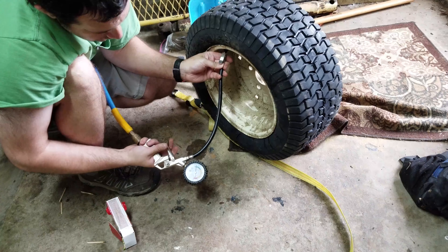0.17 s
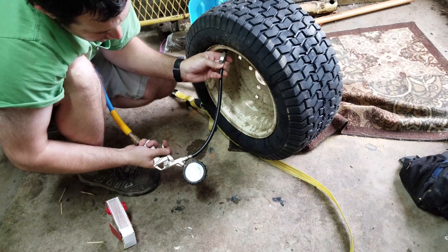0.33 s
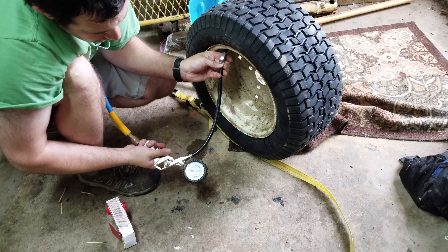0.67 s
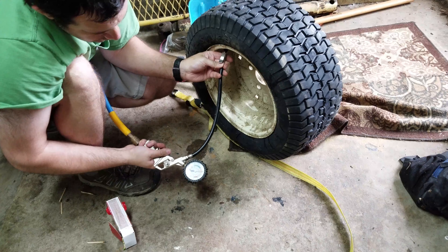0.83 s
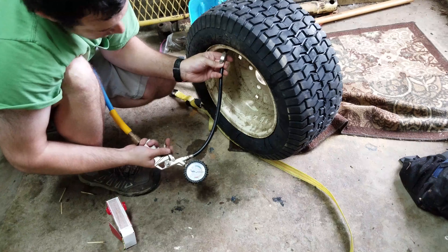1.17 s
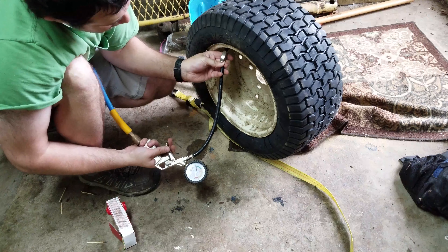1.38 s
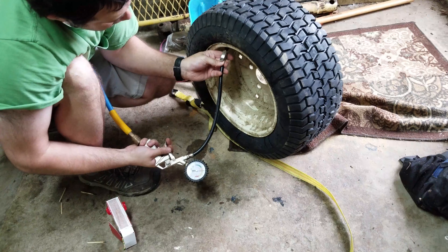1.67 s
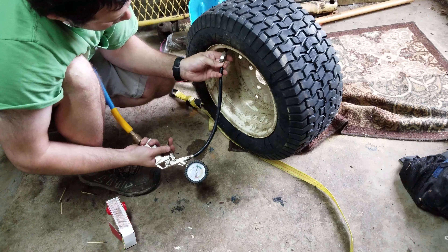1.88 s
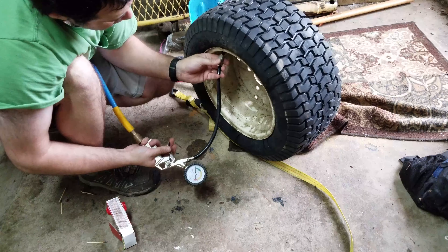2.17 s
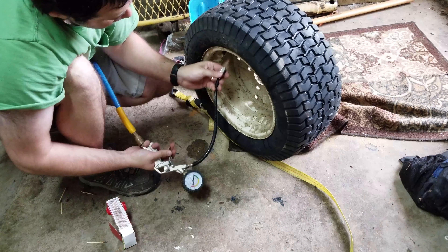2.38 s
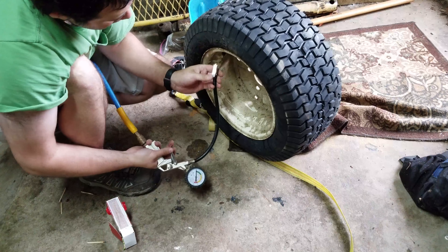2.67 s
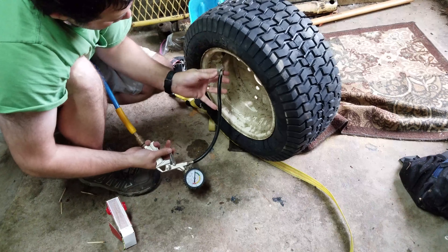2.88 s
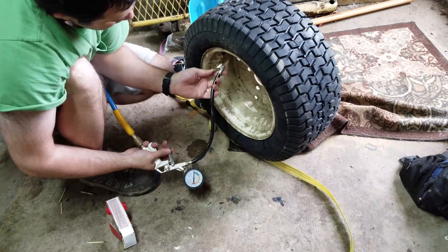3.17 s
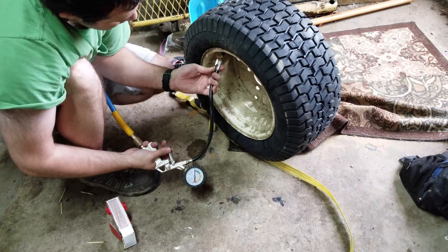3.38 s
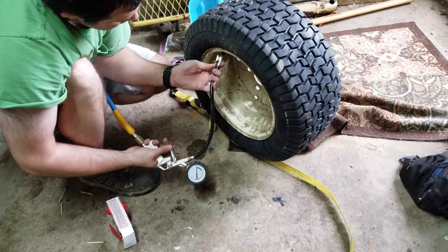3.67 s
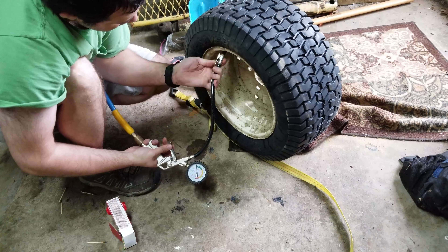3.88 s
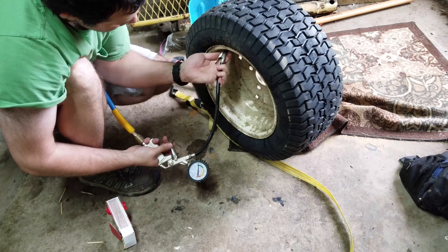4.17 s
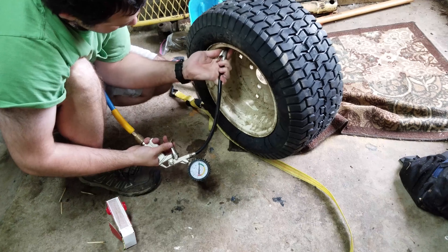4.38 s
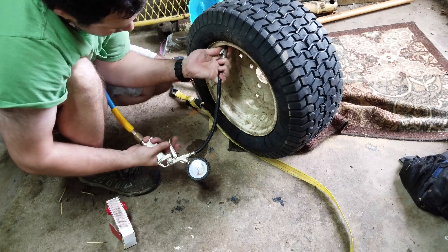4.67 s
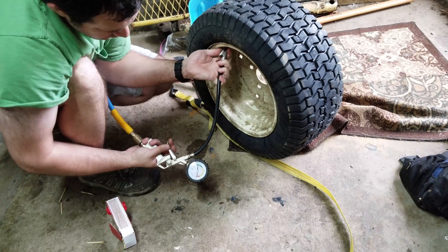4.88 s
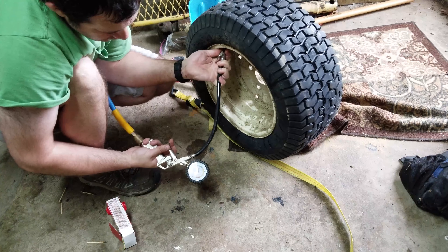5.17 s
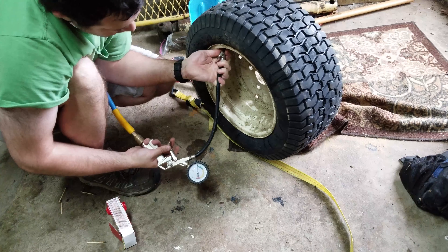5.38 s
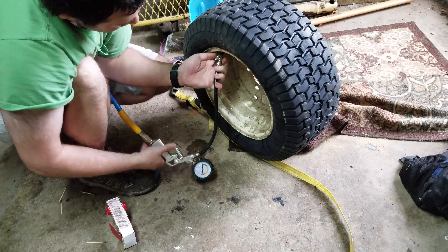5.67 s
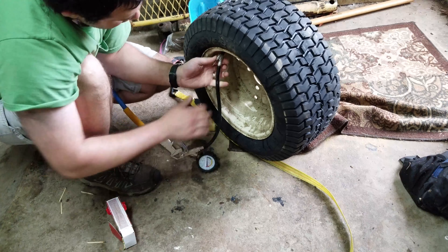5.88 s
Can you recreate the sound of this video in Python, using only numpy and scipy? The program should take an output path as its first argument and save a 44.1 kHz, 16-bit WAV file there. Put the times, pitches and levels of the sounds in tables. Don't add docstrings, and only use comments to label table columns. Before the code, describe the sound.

Harsh fizzing air spurts from a chuck on a tire, with faint whistling, small metal clicks and one sudden loud blast over low hum.

```python
import sys
import numpy as np
from scipy import signal
from scipy.fft import rfft, irfft, next_fast_len
from scipy.io import wavfile
from scipy.ndimage import uniform_filter1d

SR = 44100
rng = np.random.default_rng(int(sys.argv[2]) if len(sys.argv) > 2 else 0)


def convert_level_to_amplitude(level_db):
    exponent = np.asarray(level_db, float) / 20
    return 10 ** exponent


def log_audio(samples):
    frames = np.atleast_2d(samples).T
    limited = np.clip(frames, -1, 1)
    pcm = np.round(limited * 32767).astype(np.int16)
    wavfile.write(sys.argv[1], SR, pcm)


N = 265658

# f/Hz, level/dB per Hz
RUMBLE_COLOUR = [(15, -27), (30, -7), (43, -18), (58, 5), (72, -5), (89, -3.5), (121, -4.5), (190, -17),
                 (390, -24), (920, -23.5), (1400, -21), (1750, -26.5), (2000, -18.5), (5000, -44)]
RUMBLE_DB, RUMBLE_SWELL_DB = -78, 1.4
# multiple of its turning speed, level/dB rms
MOTOR_HUM = [(1, -78), (4, -99), (5, -99), (8, -96), (9, -93.5), (10, -102), (11, -90), (13, -96.5),
             (15, -104), (17, -106), (20, -103), (22, -97.5), (24, -96), (25, -100), (27, -103), (34, -99),
             (35, -97), (36, -100), (38, -100), (39, -99), (42, -102)]
MOTOR_HZ = 57.9
# f/Hz, time to fall 60 dB/s
SHOP_RING = [(300, 0.2), (800, 0.75), (1500, 1), (4000, 0.65), (8000, 0.33), (15000, 0.52)]
# f/Hz, level/dB per Hz
SEEP_COLOUR = [(1500, -45), (2700, -17), (3300, -19), (4250, -12), (5300, -20), (6400, -16), (7100, -10.5),
               (8150, -15), (8500, -17.5), (8900, -10), (9700, -8), (10400, -13), (13200, -8),
               (14600, -1.5)]
# seated t/s, lifted t/s, level/dB, sag/dB per s
SEATINGS = [
    (1.85, 3.4, -54.5, 1),
    (3.7, 4.62, -56, 0),
]
# t/s, level/dB, brightness f/Hz, time to fall 60 dB/s
CLICKS = [
    (1.968, -65, 6000, 0.04),
    (4.155, -55, 4530, 0.18),
    (4.255, -46.5, 3300, 0.07),
    (4.38, -64, 10000, .015),
]
# f/Hz, width/Hz, level/dB
RIM_MODES = [(1400, 330, 2), (2670, 340, -0.5), (3500, 590, -1), (5300, 460, 0), (6650, 900, -2),
             (10500, 1000, -1)]
# t/s, peak level/dB, f/Hz, time to fall 60 dB/s
KNOCKS = [
    (1.848, -61.5, 191, 0.04),
    (1.883, -64.5, 364, 0.07),
    (4.258, -62.5, 680, 0.067),
    (5.35, -57, 515, 0.046),
]
# t/s, length/s, f/Hz, level/dB
SQUEAKS = [
    (1.862, 0.03, 1858, -64.5),
    (4.524, 0.013, 11330, -54),
    (4.538, 0.035, 5300, -54),
]
# t/s, level/dB
SLEEVE = [(5.4, -100), (5.6, -83), (5.75, -81.5), (5.9, -76), (6.02, -80)]
# f/Hz, width/Hz, level/dB at the start, time to fall 60 dB/s as the tire fills
STEM_TONES = [(1127, 12, -80, 2.5), (1852, 12, -80, 6), (2660, 10, -74, 8), (5420, 15, -56, .35),
              (6130, 15, -64, 2.5), (6927, 8, -53.5, 3.5), (7622, 12, -68, 20), (10890, 15, -60, 2),
              (11715, 14, -57.5, 6), (15110, 20, -60, 2), (15633, 12, -53, 5)]
# f/Hz, level/dB per Hz
FIZZ_COLOUR = [(7000, -57), (8600, -13), (9800, -2), (10400, -0.5), (10800, 3), (11700, 2.5), (12400, 4),
               (13600, 4), (14500, 5.5), (15300, 4.5), (17000, -14.5)]
BODY_COLOUR = [(2000, -41.5), (2700, -19.5), (3300, -9), (4400, -5), (5000, -5), (5900, -2.5), (7200, -1),
               (8000, -6), (8600, -8.5), (10000, -17.5), (13000, -73)]
ROAR_COLOUR = [(120, -39), (250, -19.5), (400, -14.5), (700, -10.5), (1200, -8.5), (1450, -3.5),
               (2100, -2.5), (2800, -5.5), (3400, -17), (4500, -39), (7000, -82)]
BODY_DB, ROAR_DB = -8.5, -23.5
ROAR_GROWS = 1.2
# f/Hz, width/Hz, level/dB
HOLLOW_MODES = [(2660, 35, -9), (2710, 30, -13), (4370, 90, -7), (5450, 150, -14), (6930, 40, -9),
                (11700, 200, -1), (13500, 200, -3)]
# t/s, level/dB against the fizz
HOLLOW_BLOWN = [(0, -12.5), (.4, -15.5), (.8, -16.5), (1.4, -13.5), (1.6, -12), (1.9, -28), (6.02, -24.5)]
# opens t/s, rise/s, hold/s, fizz level/dB, closing/dB per s
LIFTS = [(-.01, 0.012, 1.78, -52.5, 603), (.3, 0.037, .5, -49.5, 150), (0.298, 0.28, .19, -47, 145),
         (.69, .05, 0.07, -49, 150), (1.03, .04, 0.34, -51, 200), (1.088, 0.067, .2, -44.5, 120),
         (1.554, 0.049, 0.24, -46.5, 600), (1.676, .012, 0.017, -44.5, 150),
         (3.337, 0.024, 0.3, -50.5, 127), (3.345, 0.014, 0.15, -46.5, 110), (3.74, 0.062, 0.13, -45.5, 252),
         (4.53, 0.033, .02, -62, 202), (4.568, 0.022, 0.13, -24.5, 231), (4.606, .02, 0.32, -46, 13),
         (5.232, 0.055, 0.3, -51.5, 152), (5.3, 0.46, .5, -54.5, 100), (5.695, 0.2, .5, -58, 100)]
# t/s, level/dB
GAP_WIDTH = [(0, 2), (.3, -0.5), (.4, -2), (.8, 1), (.95, -2), (1.3, 1), (1.55, -2), (1.83, 3), (3.36, -3),
             (3.54, 2.5), (3.8, -1.5), (4.58, 1), (4.72, 4.5), (5.0, 4), (5.25, 0), (5.35, -0.5),
             (5.6, -2.5), (6.02, -3)]
# f/Hz, likeness (1 = the same)
JET_ALIKE = [(60, 0.93), (180, 1), (550, 0.81), (1650, 0.54), (4970, 0.31), (15000, 0.053)]
# f/Hz, left minus right level/dB
PORT_LEAN = [(60, 1), (180, 7.5), (550, 0.5), (1650, 8), (4970, 6), (15000, -0.5)]


def unit(x):
    return x / np.sqrt(np.mean(x ** 2) + 1e-20)


def along(points, hz):
    f, values = np.transpose(points)
    return np.interp(np.log(hz + 1), np.log(f + 1), values)


def curve(rows):
    s, values = np.transpose(rows)
    return np.interp(np.arange(N) / SR, s, values)


def wobble(rate):
    knots = rng.standard_normal(int(N * rate / SR) + 2)
    return np.interp(np.arange(N) * rate / SR, np.arange(len(knots)), knots)


def filtered(x, response):
    size = 2 * next_fast_len(N // 2 + SR // 4)
    spectrum = rfft(x, size) * response(np.fft.rfftfreq(size, 1 / SR))
    return irfft(spectrum, size)[..., :N]


def colour(points):
    return lambda hz: convert_level_to_amplitude(along(points, hz))


def modes(rows):
    def response(hz):
        total = 0
        for k, (centre, width, db) in enumerate(rows):
            loss = 1j * hz * width
            total = total + (-1) ** k * convert_level_to_amplitude(db) * loss / (centre * centre - hz * hz + loss)
        return total
    return response


def rush(responses, patchy_db, spit_db):
    spitting = rng.standard_normal((2, N)) * convert_level_to_amplitude(spit_db * wobble(900))
    z = signal.stft(spitting, nperseg=512)[2]
    patches = uniform_filter1d(rng.standard_normal(z.shape[1:]), size=4, axis=0)
    patches = uniform_filter1d(patches, size=14, axis=1)
    pair = signal.istft(z * convert_level_to_amplitude(patchy_db * unit(patches)), nperseg=512)[1][:, :N]
    return [unit(filtered(pair, response)) for response in responses]


def scattered(pair, alike, shared, t60, direct_db, ripple, lag_s):
    t = np.arange(SR // 4) / SR
    paths = rng.standard_normal((2, len(t))) * convert_level_to_amplitude(-60 * t / t60)
    paths /= np.linalg.norm(paths[0])
    paths[:, 0] += convert_level_to_amplitude(direct_db)
    shared = np.clip(shared, 0, 1)
    sideways = shared * pair[0] + np.sqrt(1 - shared ** 2) * pair[1]

    def combing(hz):
        turn = np.arccos(np.clip(along(alike, hz), -1, 1)) / 2
        comb = rfft(paths, 2 * len(hz) - 2) / np.linalg.norm(paths[0])
        comb *= (np.abs(comb) + 1e-6) ** (ripple - 1)
        return comb * [np.cos(turn), 1j * np.sin(turn)]

    mid, side = filtered(np.array([pair[0], sideways]), combing)
    return np.array([np.roll(mid + side, round(lag_s * SR)), mid - side])


def shop(x):
    hz, t, z = signal.stft(rng.standard_normal((2, SR)), SR, nperseg=256)
    fading = convert_level_to_amplitude(-60 * t / along(SHOP_RING, hz)[:, None])
    tail = signal.istft(z * fading, SR, nperseg=256)[1]
    tail /= np.linalg.norm(tail[0])
    delayed = np.pad(x, (300, 0))
    return signal.fftconvolve(delayed[None], tail, axes=1)[:, :N]


def background():
    turn = 2 * np.pi * np.cumsum(MOTOR_HZ + 0.048 * wobble(1.996)) / SR
    hum = np.zeros(N)
    for multiple, db in MOTOR_HUM:
        unsteady = convert_level_to_amplitude(db + 2.06 * wobble(7))
        hum += np.sqrt(2) * unsteady * np.sin(multiple * turn + rng.uniform(0, 2 * np.pi))
    swell = convert_level_to_amplitude(RUMBLE_DB + RUMBLE_SWELL_DB * wobble(6.5) + 5.0)
    rumble = swell * rush([colour(RUMBLE_COLOUR)], patchy_db=2.0, spit_db=0.5)[0]
    return scattered(convert_level_to_amplitude(1.5) * hum + rumble, [(60, 0.99), (200, 0.7), (1000, 0.55)],
                     shared=0.43, t60=0.26, direct_db=0, ripple=0.18, lag_s=0.00032)


def cloth():
    rubbing = rng.standard_normal(N) * convert_level_to_amplitude(4.0 * wobble(60))
    return convert_level_to_amplitude(curve(SLEEVE)) * unit(filtered(rubbing, modes([(110, 116, 7), (1070, 440, 0)])))


def place(out, s, sound):
    out[round(s * SR):][:len(sound)] += sound


def knocks():
    out, t = np.zeros(N + SR), np.arange(SR // 5) / SR
    soft = 1 - np.exp(-t / 0.0038)
    for s, db, hz, t60 in KNOCKS:
        tones = np.sin(2 * np.pi * hz * t) + 0.59 * np.sin(2 * np.pi * 0.9 * hz * t)
        place(out, s, convert_level_to_amplitude(db - 60 * t / t60) * soft * tones)
    return out[:N]


def clicks():
    out, t = np.zeros(N + SR), np.arange(SR // 5) / SR
    hz = np.fft.rfftfreq(len(t), 1 / SR)
    for s, db, bright_hz, t60 in CLICKS:
        grit = rng.standard_normal(len(t)) * convert_level_to_amplitude(-60 * t / t60) * (1 - np.exp(-t / 0.0013))
        near = [(f, width, level - 4 * abs(np.log2(f / bright_hz))) for f, width, level in RIM_MODES]
        place(out, s, convert_level_to_amplitude(db + 5) * irfft(rfft(grit) * modes(near)(hz), len(t)))
    return out[:N]


def squeaks():
    out, t = np.zeros(N + SR), np.arange(SR // 5) / SR
    for s, length, hz, db in SQUEAKS:
        swell = np.sin(np.pi * np.clip(t / length, 0, 1) ** 1.2)
        drift = np.cumsum(rng.standard_normal(len(t))) * 0.19
        place(out, s, convert_level_to_amplitude(db) * swell * np.sin(2 * np.pi * hz * t + drift))
    return out[:N]


def whistle():
    t = np.arange(2 * SR) / SR
    tones = np.zeros(len(t))
    for hz, width, db, t60 in STEM_TONES:
        drift = np.cumsum(rng.standard_normal(len(t))) * np.sqrt(2 * np.pi * width / SR)
        level = convert_level_to_amplitude(db - 60 * t / t60 + 2.1 * wobble(15)[:len(t)])
        tones += level * np.sin(2 * np.pi * hz * t + drift)
    flowing = np.clip((0.95 - t) / 0.15, 0, 1)
    return np.pad(tones * flowing, (0, N - len(t)))


def seep():
    now = np.arange(N) / SR
    level = np.zeros(N)
    for seated, lifted, db, sag_db in SEATINGS:
        leaking = np.clip(np.minimum(now - seated, lifted - now) / 0.05, 0, 1)
        level += leaking * convert_level_to_amplitude(db - sag_db * (now - seated))
    return level * convert_level_to_amplitude(0.47 * wobble(4.9)) * rush([colour(SEEP_COLOUR)], patchy_db=-2.3, spit_db=0.0)[0]


def lift(now, opens, rise, hold, db, closing_db):
    opening = np.clip((now - opens) / rise, 0, 1) ** 1.29
    closing_s = np.clip(now - opens - rise - hold, 0, None)
    return (opening * convert_level_to_amplitude(db - closing_db * closing_s)) ** 2


def jet():
    now = np.arange(N) / SR
    flow = np.sqrt(sum(lift(now, *row) for row in LIFTS))
    gap_db = curve(GAP_WIDTH)
    blast_db = 3.5 * np.exp(-((now - 4.61) / 0.047) ** 2) - 5.5 * np.exp(-((now - 4.72) / 0.047) ** 2)
    hollow = modes(HOLLOW_MODES)
    responses = [colour(FIZZ_COLOUR), colour(BODY_COLOUR), colour(ROAR_COLOUR), lambda hz: np.abs(hollow(hz))]
    fizz, body, roar, blown = rush(responses, patchy_db=1.5, spit_db=0.86)
    air = convert_level_to_amplitude(1.8) * fizz
    air = air + convert_level_to_amplitude(BODY_DB + gap_db + 1.61) * body
    air = air + convert_level_to_amplitude(ROAR_DB + ROAR_GROWS * gap_db + blast_db - 2.0) * roar
    air = air + convert_level_to_amplitude(curve(HOLLOW_BLOWN)) * blown
    return flow * convert_level_to_amplitude(0.62 * wobble(25)) * air


def scene():
    air = jet()
    metal = clicks() + knocks() + squeaks() + cloth() + whistle()
    wheel = scattered(air, JET_ALIKE, shared=0.5, t60=0.099, direct_db=3.5, ripple=0.61, lag_s=0)
    wheel = wheel * convert_level_to_amplitude([[-0.875], [0.875]])
    leak = scattered(seep(), [(2000, 0.14), (15000, 0.15)],
                     shared=0.23, t60=0.22, direct_db=-5.5, ripple=0.86, lag_s=0.00027)
    echo = convert_level_to_amplitude(-12.0) * shop(air[0] + convert_level_to_amplitude(8.5) * metal)
    return wheel + leak + metal * convert_level_to_amplitude([[0.6], [-0.6]]) + echo + background()


def ducked(x):
    from_db, share, release_db_per_s = -37, 0.38, 12.5
    power = uniform_filter1d(np.mean(x ** 2, axis=0), size=600)
    level_db = 10 * np.log10(np.abs(power) + 1e-12)
    slope_db = release_db_per_s * np.arange(N) / SR
    held_db = np.maximum.accumulate(level_db + slope_db) - slope_db
    return x * convert_level_to_amplitude(-share * np.clip(held_db - from_db, 0, None))


def band_limit(x):
    return signal.sosfilt(signal.butter(12, 17070, fs=SR, output="sos"), x)


def record(dry):
    def port_response(hz):
        lean_db = np.outer([0.5, -0.5], along(PORT_LEAN, hz))
        return convert_level_to_amplitude(lean_db) * (hz < 15760)

    mix = filtered(ducked(dry), port_response)
    return band_limit(mix)


dry = scene()
out = record(dry)
log_audio(out)
```